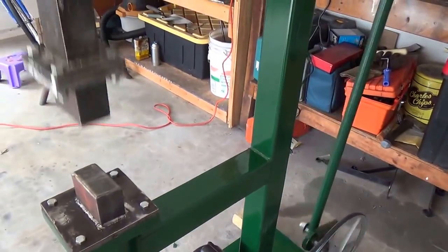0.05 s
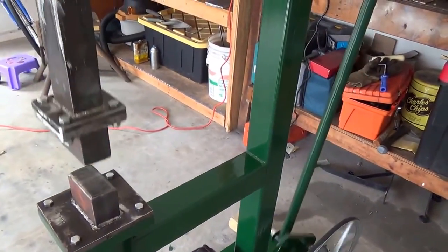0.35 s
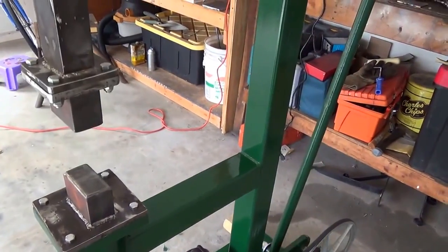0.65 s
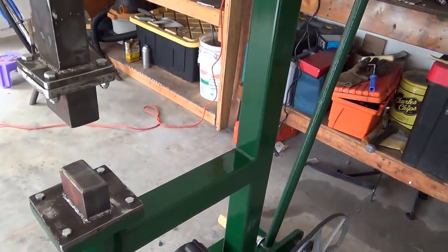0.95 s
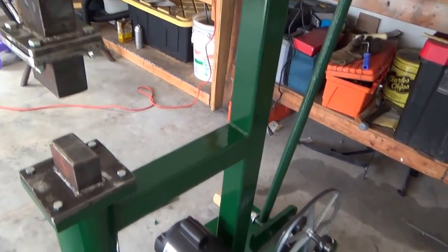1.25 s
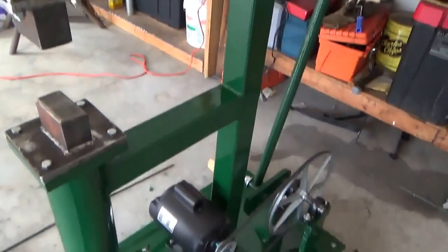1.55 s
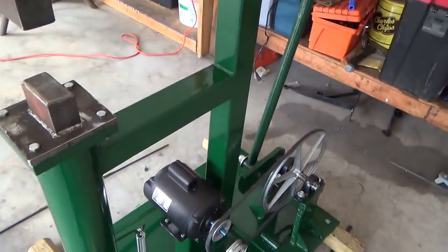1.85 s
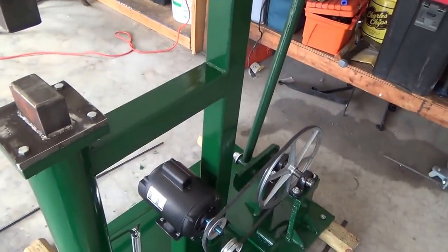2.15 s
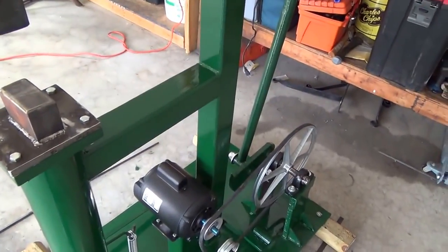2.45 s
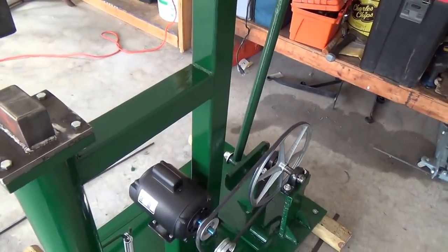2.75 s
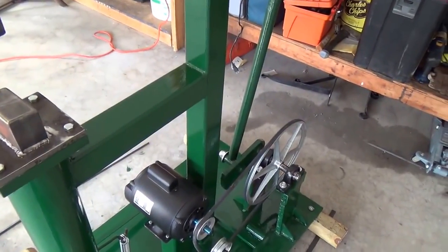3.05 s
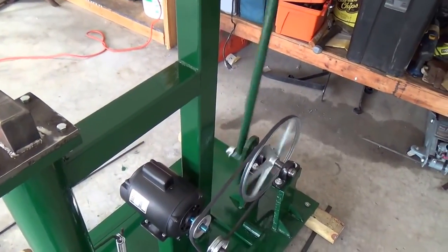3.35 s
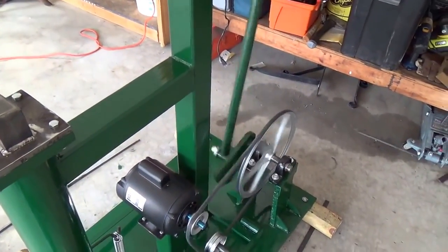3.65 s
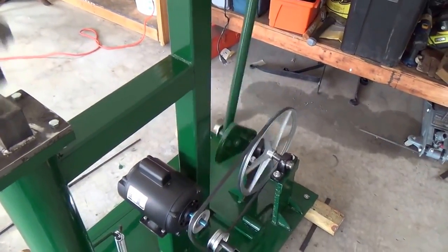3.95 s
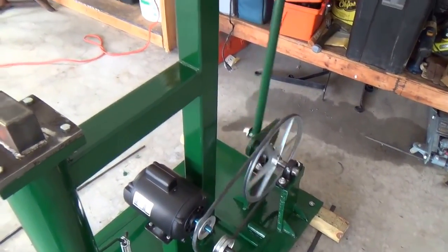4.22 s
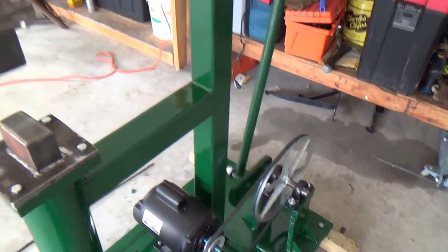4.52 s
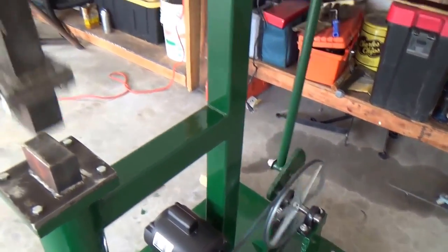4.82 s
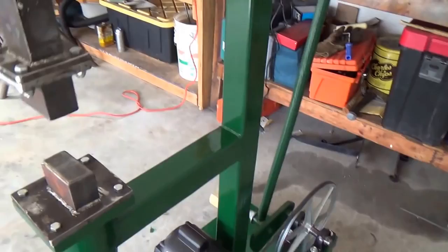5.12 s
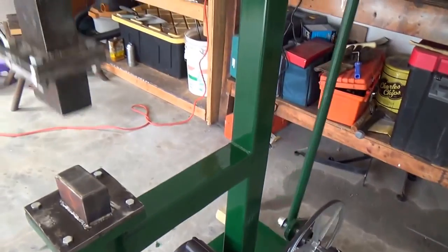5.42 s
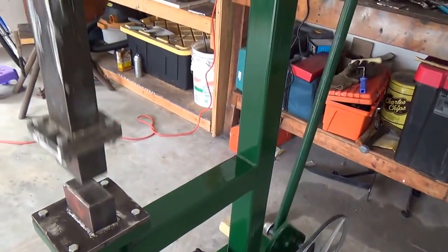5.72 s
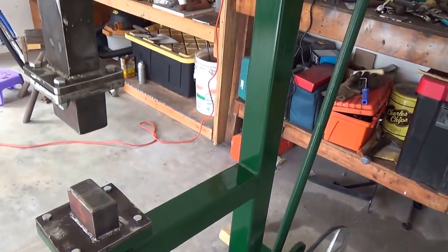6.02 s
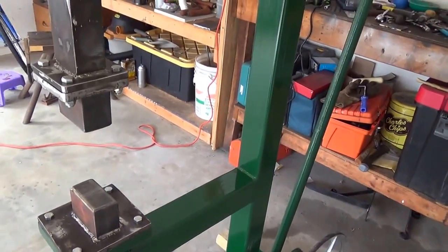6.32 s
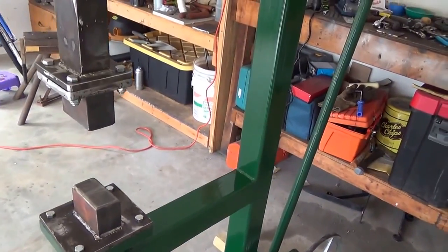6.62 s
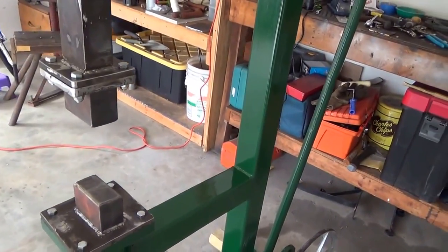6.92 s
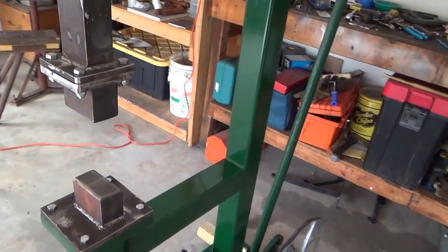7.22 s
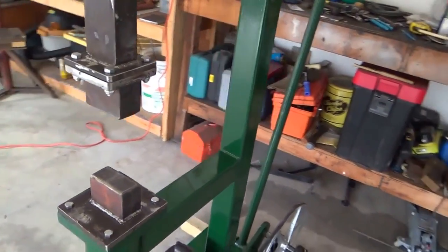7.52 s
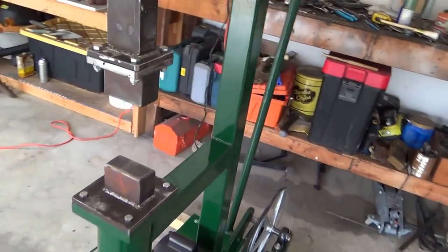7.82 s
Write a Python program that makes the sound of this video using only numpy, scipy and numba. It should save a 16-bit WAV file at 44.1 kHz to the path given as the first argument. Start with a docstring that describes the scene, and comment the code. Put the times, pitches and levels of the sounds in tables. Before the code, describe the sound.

A motor-driven power hammer is heard close up in a garage. Light linkage clanks lead into one loud steel-on-steel bang at about 0.3 seconds, which rings briefly and leaves a few clinks. An electric motor then hums with a soft fan hiss, growing gradually louder from about 1.5 seconds and peaking between 3.4 and 4.4. The linkage starts clanking at 3.4 seconds, and five heavy blows land at about 3.6, 4.0, 4.4, 5.0 and 5.7 seconds, spaced ever wider. The first carries a very brief high squeal, and the early ones have low thumps beneath them. Each blow is a hard, dense bang with ringing steel and short room echo, and loose parts clank, clink and chatter in between. From 6 seconds the motor hums quietly, with a light knock near 6.9 seconds and a faint whirr rising until the end at about 8 seconds.

```python
"""A home-built power hammer strikes its die in a garage, each impact exciting the modes of the steel frame.
The ram rebounds and squeals in its guide; the slack linkage clanks and loose parts clink and chatter.
Underneath, an electric motor hums at multiples of the mains frequency, with rotor tones and fan noise,
and grows louder as the belt grips. A limiter flattens each blow and its reverberation into a roar."""
import sys
import numpy as np
from scipy import signal
from scipy.fft import rfft, irfft, next_fast_len
from scipy.io import wavfile
from scipy.ndimage import uniform_filter1d
from numba import njit

SR = 44100
rng = np.random.default_rng(int(sys.argv[2]) if len(sys.argv) > 2 else 0)


def waveform_to_disk(signal):
    """Save audio, clipped to [-1, 1], as 16-bit WAV at the path in sys.argv[1]."""
    frames = np.transpose(np.atleast_2d(signal))
    scaled = np.clip(frames, -1, 1) * 32767
    samples = np.round(scaled).astype(np.int16)
    wavfile.write(sys.argv[1], SR, samples)


N = 351477
TIME = np.arange(N) / SR

# impacts of the ram on the die: t/s, level/dB, brightness/dB
BLOWS = [(.284, -1.5, 0), (3.592, 6, 4.5), (3.952, 4, 7), (4.404, 1.5, 6.5), (4.957, -1, 3.5),
         (5.690, -2, 6)]
# joints of crank, rod and ram guide taking up their slack, and at 0.29 s a second contact of the die in the
# first blow: t/s, level/dB, brightness/dB
CLANKS = [(.001, -27, -14.5), (0.0603, -27, 2), (0.079, -20.5, 6), (0.114, -26, -6), (.139, -21, 8),
          (.158, -16.5, 4), (.2, -24.5, -7), (.29, -4, -2), (.433, -27, 1), (.526, -20, -4),
          (0.613, -38, 17), (3.442, -14, 10), (3.477, -13.5, 3), (3.5244, -16.5, 10), (3.546, -11, 12),
          (3.7787, -8.5, 10), (3.8535, -11.5, 5), (3.9142, -14, 3), (4.104, -20, 13), (4.23, -17, 6.5),
          (4.311, -19, 6), (4.3229, -13, -1.5), (4.359, -23, -8), (4.7638, -28, 15.5), (4.8305, -20.5, 9),
          (4.848, -21.5, 12.5), (4.88, -17.5, 0), (4.9356, -21.5, 12), (5.0755, -15, 2), (5.4526, -23, 6),
          (5.5182, -30, -4), (5.5432, -21, 9), (5.5912, -24, -2), (5.745, -5.5, 3), (5.8158, -16.5, 11),
          (5.865, -24, 11), (5.9439, -23, 14)]
# light knocks of the idling machine: t/s, level/dB, brightness/dB
KNOCKS = [(6.832, -57, -15), (6.869, -39, 0), (6.905, -46.5, 2)]
# resonances of frame and anvil: f/Hz, bandwidth/Hz, lift/dB
FRAME_RESONANCES = [(143.2, 15, 13.5), (201.5, 56, 17), (229.4, 55, 15.5), (312, 27, 10), (389.4, 20, 6),
                    (678, 88, 4.5), (782, 8.8, 8), (816, 25, 3), (903, 110, 6), (916, 110, 3),
                    (996, 64, 8.5), (1113, 120, 3.5), (1382, 30, 1), (1580, 55, 1.5), (1690, 59, 2),
                    (1650, 62, -4.5), (1872, 63, 0.5), (2110, 46, -11), (2232, 44, -0.5), (2290, 64, 9),
                    (3500, 63, 5.5), (5200, 560, 4), (7950, 600, 7.5), (10200, 300, 13.5), (11100, 300, 5)]
# width of the sound field: f/Hz, side level re mid/dB
FIELD_WIDTH = [(100, -11), (300, -9), (700, -6.5), (2500, -7.5), (5500, -7), (7500, -10.5), (9500, -14.5),
               (11500, -27), (13000, -37)]


def amp(db):
    """Amplitude ratio of a level in decibels."""
    return 10 ** (np.asarray(db) / 20)


def unit(x):
    """Normalisation to an rms of 1."""
    return x / np.sqrt(np.mean(x ** 2))


def fade(t, t60):
    """Exponential decay, 60 dB in t60 seconds."""
    return np.exp(-np.log(1000) * t / t60)


def along(points, hz):
    """Interpolation of (f/Hz, value) points on a logarithmic frequency axis."""
    f, value = np.transpose(points)
    return np.interp(np.log(hz + 1), np.log(f), value)


def add(track, s, sound):
    """Superposition of a sound on the track from time s."""
    i = max(int(s * SR), 0)
    track[i:i + len(sound)] += sound[:N - i]


def walk(rate_hz):
    """Slow random fluctuation of rms 1: random steps, smoothed twice."""
    hold = int(SR / rate_hz)
    steps = np.repeat(rng.standard_normal(N // hold + 1), hold)
    return unit(uniform_filter1d(uniform_filter1d(steps, hold), hold)[:N])


def tint(x, points):
    """Zero-phase filtering by (f/Hz, gain/dB) points."""
    size = next_fast_len(x.shape[-1])
    gain = amp(along(points, np.fft.rfftfreq(size, 1 / SR)))
    return irfft(rfft(x, size) * gain, size)[..., :x.shape[-1]]


def body(x, colour, modes=(), size=16384):
    """Minimum-phase resonator of unit energy: peaks on a broad spectrum; a lift's sign is ignored."""
    hz = np.fft.rfftfreq(size, 1 / SR)
    lift = 1 + sum((amp(abs(db)) ** 2 - 1) / (1 + (2 * (hz - f) / width) ** 2) ** 2
                   for f, width, db in modes)
    cepstrum = irfft(np.log(amp(along(colour, hz)) * np.sqrt(lift)))
    response = irfft(np.exp(rfft(2 * cepstrum[:size // 2], size)))
    return signal.fftconvolve(x, response / np.linalg.norm(response))[:N]


def strikes(events, crack_db, crack_t60, ring_t60, split_hz, rise_s, patchy_db=0):
    """Impact excitation: noise with a fast and a slow decay, tilted about split_hz by its brightness."""
    track, t = np.zeros(N), np.arange(SR // 2) / SR
    envelope = (amp(crack_db) * fade(t, crack_t60) + fade(t, ring_t60)) * (1 - np.exp(-t / rise_s))
    patch_hz = 331.5  # width of the bands that one contact favours
    for s, db, bright_db in events:
        patches = [(patch_hz * (k + 2), patchy_db * z) for k, z in enumerate(rng.standard_normal(48))]
        burst = unit(tint(rng.standard_normal(len(t)), patches)) * envelope
        low = signal.lfilter(*signal.butter(1, split_hz, fs=SR), burst)
        add(track, s, amp(db) * (amp(-bright_db / 2) * low + amp(bright_db / 2) * (burst - low)))
    return track


def rings(events, hz, t60, rise_s):
    """Free vibration of a single mode: a damped sinusoid after each event."""
    track, t = np.zeros(N), np.arange(2 * SR) / SR
    for s, db, *_ in events:
        add(track, s, amp(db) * fade(t, t60) * (1 - np.exp(-t / rise_s)) * np.sin(2 * np.pi * hz * t))
    return track


def echo(x, wet_db, build_s):
    """Diffuse reverberation at one point, each band decaying at its own rate; mid and side."""
    # reverberation time of the garage: f/Hz, T60/s
    decay_times = [(100, 0.26), (300, 0.75), (1000, 0.66), (3000, 0.57), (6000, 0.48), (12000, 0.28)]
    t, hz = np.arange(SR) / SR, np.fft.rfftfreq(SR, 1 / SR)
    centres, t60s = np.transpose(decay_times)
    noise, tail = rfft(rng.standard_normal((2, SR))), 0
    for t60, band in zip(t60s, np.eye(len(centres))):
        share = np.interp(np.log(hz + 1), np.log(centres), band)
        tail = tail + irfft(noise * share) * fade(t, t60)
    tail = tail * (1 - np.exp(-t / build_s))
    mid, side = amp(wet_db) * tail / np.linalg.norm(tail[0])
    return np.array([signal.fftconvolve(x, response)[:N] for response in (mid, tint(side, FIELD_WIDTH))])


def garage(x, wet_db, build_s, drift_hz=0.8):
    """Direct sound plus an echo that shifts as the listener drifts through standing waves; mid and side."""
    turn = 2 * np.pi * drift_hz * TIME
    mid, side = np.cos(turn) * echo(x, wet_db, build_s) + np.sin(turn) * echo(x, wet_db, build_s)
    return np.array([x + mid, side])


def whirr():
    """Narrow-band noise: a faint whirr that rises at the end."""
    # envelope of the whirr: t/s, level/dB
    swell = [(6.9, -71), (7.4, -59.5), (7.95, -56.5)]
    # its spectrum: f/Hz, level/dB
    colour = [(2200, -25), (2550, -2), (2720, 1), (2900, -8), (3300, -23)]
    return amp(np.interp(TIME, *np.transpose(swell))) * body(rng.standard_normal(N), colour)


def air_noise(hiss_level, nearness_db, rotation):
    """Turbulence of fan and belt: a low rush, and a hiss whose cowl resonances emerge near the motor."""
    # spectrum of the hiss: f/Hz, level/dB
    hiss_colour = [(1180, -40), (2000, -10.5), (2500, -11), (2750, -2.5), (3230, -9.5), (3640, -8),
                   (4320, -7), (6040, -6.5), (6810, -6.5), (9430, 1), (10100, -2), (12250, -5.5),
                   (12550, -12), (15500, -21)]
    # resonances of bearings and fan cowl: f/Hz, bandwidth/Hz, lift/dB
    cowl_modes = [(2700, 120, 9), (3610, 280, 12), (4750, 70, 12.5), (5750, 65, 14), (6180, 200, 13),
                  (7380, 300, 9.5), (7900, 130, 1), (9300, 200, 4), (9570, 170, 7), (12100, 300, 4)]
    # spectrum of the rush: f/Hz, level/dB
    rush_colour = [(25, -12), (60, -6), (130, -2.5), (300, 4.5), (620, 3), (1000, -2.5), (1270, -1.5),
                   (1500, -3.5), (2200, -7.5), (3500, -27.5), (8000, -55)]
    cowl_share = np.clip(1 + 0.031 * nearness_db, 0, 1) ** 2
    hiss_gain = amp(hiss_level + 6.5 + 0.84 * walk(rate_hz=35)) * (1 + 0.078 * rotation)
    resonant = np.sqrt(cowl_share) * body(rng.standard_normal(N), hiss_colour, cowl_modes)
    plain = np.sqrt(1 - cowl_share) * body(rng.standard_normal(N), hiss_colour)
    rush_level = -46 + 0.59 * (hiss_level + 54.5)
    rush = body(rng.standard_normal(N), rush_colour) * amp(rush_level + 1.1 * walk(rate_hz=16))
    return hiss_gain * (resonant + plain) + rush


def tone(hz, waver_db=3.5, drift_rad=1.0):
    """Random amplitude and phase modulation of a sinusoid: a motor tone wavering with the load."""
    gain = np.sqrt(2) * amp(waver_db * walk(rate_hz=12))
    return gain * np.sin(2 * np.pi * hz * TIME + drift_rad * walk(rate_hz=5.3))


def magnetic_hum(hum_level, rotation, mains_hz=60, waver_db=1.03):
    """Magnetic forces sound even harmonics of the mains; the fourth throbs once a turn of the rotor."""
    throb = 1 + 0.2 * amp(4.9 * walk(rate_hz=7.1)) * rotation
    fourth = amp(hum_level) * throb * tone(4 * mains_hz, waver_db, drift_rad=0.08)
    sixth_level = -45.5 - 0.89 * (hum_level + 40)  # recedes as the hum grows
    sixth = amp(sixth_level) * tone(6 * mains_hz, waver_db, drift_rad=0.08)
    second = amp(hum_level - 23.5) * tone(2 * mains_hz, waver_db, drift_rad=0.11)
    return second + fourth + sixth


def motor(rotor_hz=28.87, tonal_gain_db=2):
    """Rotating-machine noise: a line spectrum over broadband air noise; mid and side."""
    # swell as the listener nears and the belt grips: t/s, hum/dB, hiss/dB, left minus right/dB
    course = [(.9, -39, -59.5, 0.5), (1.4, -38, -58.5, 1), (2.35, -32.5, -53.5, -1),
              (3.1, -29.5, -51, -1.3), (3.42, -26.5, -46, -2), (4.35, -26.5, -45, -4),
              (4.6, -34, -57.5, -2), (6.35, -40, -61, 1), (7.95, -39.5, -58.5, 0.7)]
    # tones of rotor and belt: f/Hz, relative level/dB
    rotor_tones = [(88, -47), (144, -29), (234, -15), (246, -41), (269, -13), (333, -23.5), (383, -19),
                   (388, -14.5), (479, -22.5), (538, -39.5), (630, -33), (694, -36), (721, -37), (840, -29),
                   (1023, -24), (1141, -29), (1222, -33), (1319, -28.5)]
    # tones of the idling drive, filling the room evenly: f/Hz, level/dB
    idle_tones = [(86, -68.5), (328, -58.5), (441, -62), (544, -63.5), (694, -63)]
    times, *columns = np.transpose(course)
    hum_level, hiss_level, pan_db = (np.interp(TIME, times, column) for column in columns)
    nearness_db = hum_level + 24
    rotation = np.sin(2 * np.pi * rotor_hz * TIME)
    hum = magnetic_hum(hum_level, rotation)
    rotor_level = hum_level + 0.34 * nearness_db  # grows faster than the hum
    rotor = amp(rotor_level) * sum(amp(db) * tone(hz) for hz, db in rotor_tones)
    idle = sum(amp(db) * tone(hz) for hz, db in idle_tones)
    air_mid, air_side = (air_noise(hiss_level, nearness_db, rotation) for _ in range(2))
    mid = amp(tonal_gain_db) * (hum + rotor) + idle + air_mid
    side = tint(air_side, FIELD_WIDTH) + mid * (1 - amp(pan_db)) / (1 + amp(pan_db))
    return np.array([mid, side])


def idle_knocks():
    """Light impacts excite a few resonances while the machine idles."""
    # spectrum of a knock: f/Hz, level/dB
    colour = [(100, -25), (600, -4), (1300, -2), (2100, -2), (3000, -5), (4200, -9), (7000, -27),
              (14000, -34)]
    # its resonances: f/Hz, bandwidth/Hz, lift/dB
    modes = [(2050, 150, 8), (2400, 40, 9), (2880, 140, 0)]
    contacts = strikes(KNOCKS, crack_db=9, crack_t60=0.042, ring_t60=0.15, split_hz=2400, rise_s=0.0019)
    return body(contacts, colour, modes)


def knock_ping():
    """Quickly damped modes give each idle knock a bright onset."""
    # modes of the onset: f/Hz, level re knock/dB
    modes = [(2837, 8), (2950, -7.5), (3090, 1)]
    return sum(amp(db) * rings(KNOCKS, hz, t60=0.095, rise_s=0.001) for hz, db in modes)


def bolt_chatter(shake, ticks_per_s=40, scatter_db=3.5, t60=0.016, gain_db=-6):
    """Forced rattling: loose bolts tick at random, in proportion to the rms of the shaking."""
    # spectrum of the ticks: f/Hz, level/dB
    colour = [(1000, -33), (3000, -2), (5200, 1.5), (8300, 0), (11000, -4.5), (13000, -20), (15500, -50)]
    power = signal.lfilter(*signal.butter(1, 22, fs=SR), shake ** 2)
    ticks = (rng.random(N) < ticks_per_s / SR) * amp(scatter_db * rng.standard_normal(N))
    envelope = signal.lfilter([1], [1, -fade(1 / SR, t60)], ticks)
    return amp(gain_db) * body(np.sqrt(np.abs(power)) * envelope * rng.standard_normal(N), colour)


def clinks(spread=0.17, t60=0.03, rise_s=0.00059, count=9):
    """Free vibration of small steel parts: clusters of close, high modes that die quickly."""
    # contacts of loose washers and pins: t/s, level/dB, centre f/Hz
    contacts = [(.0338, -35.5, 7200), (.062, -22, 7800), (.079, -24, 8100), (.1116, -18, 5000),
                (0.137, -20, 5230), (0.1568, -17, 8600), (.293, 7, 9100), (.4319, -10.5, 5220),
                (0.451, -12.5, 9660), (0.526, -14.5, 4130), (.527, -19, 7950), (.613, -30, 9150),
                (3.732, -9, 9300), (3.8535, -4.5, 9800), (3.9137, -10, 5440), (3.964, 7, 8500),
                (4.1037, -7.5, 9440), (4.2144, -14, 8500), (4.4859, -9, 3440), (4.5412, -4, 5220),
                (4.6131, -16, 3480), (4.614, -23, 9300), (4.761, -29, 8450), (4.852, -9, 8280),
                (4.8993, -21, 3140), (4.936, -14, 3660), (5.1084, -15, 5170), (5.1274, -15, 5260),
                (5.182, -29, 8400), (5.445, -25, 3350), (5.4527, -18, 8270), (5.519, -15, 3050),
                (5.52, -21, 5600), (5.526, -23, 3900), (5.533, -19, 2460), (5.5437, -15, 8500),
                (5.5914, -28, 3100), (5.594, -22, 8570), (5.742, -6, 8840), (5.9254, -16, 7800)]
    track, t = np.zeros(N), np.arange(SR // 4) / SR
    for s, db, centre_hz in contacts:
        offsets = np.linspace(-1, 1, count) + rng.uniform(-0.6, 1, count) / count
        hz = centre_hz * (1 + spread * offsets)
        weights = rng.uniform(0.12, 1, count) * np.hanning(count + 2)[1:-1]
        modes = np.sin(2 * np.pi * (hz[:, None] * t + rng.random((count, 1))))
        ring = weights @ modes / np.linalg.norm(weights)
        add(track, s, amp(db) * ring * fade(t, t60) * (1 - np.exp(-t / rise_s)))
    return track


def pivot_pin():
    """Close, randomly modulated modes beat: a pin sings thinly as the linkage swings over."""
    # excitations of the pin: t/s, level/dB
    pings = [(.167, -26), (.53, -42), (3.868, -18), (4.33, -38), (4.875, -41), (5.16, -39), (5.72, -21),
             (5.81, -36)]
    # its modes: f/Hz, relative level/dB
    modes = [(13540, -6), (13660, -11), (13800, -6), (14150, -19)]
    return sum(amp(db) * rings(pings, hz, t60=0.21, rise_s=0.003) * walk(rate_hz=140) for hz, db in modes)


def connecting_rod(gain_db=-14.5):
    """Modal ringing of the rod after each clank, with new random phases every time."""
    # modes of the rod: f/Hz, relative level/dB, T60/s
    rod_modes = [(2680, -19.5, 0.15), (2870, -6, 0.2), (3450, -27, 0.14), (4920, -25.5, 0.34),
                 (5460, -16, 0.4), (6240, -29, 0.23), (8050, -17, 0.15), (8600, -30, 0.12),
                 (9500, -60, 0.16), (9900, -33, 0.24), (10500, -41, 0.28)]
    track, t = np.zeros(N), np.arange(SR // 2) / SR
    modes = np.array([amp(db) * fade(t, t60) * np.exp(2j * np.pi * hz * t) for hz, db, t60 in rod_modes])
    for s, db, bright_db in CLANKS:
        phasors = np.exp(2j * np.pi * rng.random(len(modes)))
        add(track, s, amp(gain_db + db + bright_db / 2) * (phasors @ modes).imag)
    return track


def rebounds(gap_s=0.045, drop_db=11.5, fall_db_per_s=82.5, bright_db=10.5):
    """Inelastic, uneven bounces of the ram after each blow, as rows of t/s, level/dB, brightness/dB."""
    events = []
    for s, blow_db, _ in BLOWS:
        for k in range(1, 5):
            jitter_s, scatter_db = rng.normal(0, [0.007, 5])
            delay = k * gap_s + jitter_s
            events.append((s + delay, blow_db - drop_db - fall_db_per_s * delay + scatter_db, bright_db))
    return events


def linkage_clanks():
    """Backlash: joints closing their slack, and the bouncing ram, excite the linkage's resonances."""
    # spectrum of a clank: f/Hz, level/dB
    colour = [(30, -34), (100, -0.5), (200, 8), (500, 10), (1500, 6), (3000, 4), (5500, 0), (8500, -4.5),
              (11000, -6.5), (12500, -14.5), (15500, -48)]
    # resonances of the linkage: f/Hz, bandwidth/Hz, lift/dB
    modes = [(239.4, 33, 8.5), (415, 96, 2), (674, 75, 5), (990, 88, 2), (1059, 46, 4.5), (3090, 120, -1.5),
             (3550, 140, 0), (5360, 770, 2), (7700, 230, 3), (8370, 240, 6), (10900, 440, 3.5)]
    contacts = strikes(CLANKS + rebounds(), crack_db=5.5, crack_t60=0.019, ring_t60=0.12,
                       split_hz=2430, rise_s=0.0017, patchy_db=2)
    return body(contacts, colour, modes)


def guide_squeal(fundamental_hz=2010, waver=0.0054):
    """Stick-slip friction of the lifting ram in its guide gives high harmonics of unsteady pitch."""
    # squeals: t/s, duration/s, level/dB
    squeals = [(3.6, 0.027, -1), (3.634, .03, -8), (3.668, .025, -16)]
    # their overtones: harmonic number, relative level/dB
    harmonics = [(4, 1), (5, 0), (6, -9)]
    swell = np.zeros(N)
    for s, length, db in squeals:
        add(swell, s, amp(db) * np.hanning(int(length * SR)))
    phase = 2 * np.pi * np.cumsum(fundamental_hz * (1 + waver * walk(rate_hz=270))) / SR
    return swell * sum(amp(db) * np.sin(k * phase) for k, db in harmonics)


def base_thumps():
    """Soft impacts give low frequencies: the base rocks on its timber feet in the hardest strokes."""
    # landings of the base: t/s, level/dB, brightness/dB
    thumps = [(3.55, -25, -6), (3.87, -16, -9), (3.96, -2, -12), (4.31, -17, -1), (4.41, -13, -6)]
    # spectrum of a thump: f/Hz, level/dB
    colour = [(25, -25), (50, -17), (75, -2), (105, -10), (150, 4), (220, 5), (400, -36), (1000, -77)]
    contacts = strikes(thumps, crack_db=0, crack_t60=0.022, ring_t60=0.11, split_hz=560, rise_s=0.0054)
    return body(contacts, colour)


def frame_ring(scatter_db=4.5, side_db=-12):
    """Lightly damped modes of the frame ring on, weighted anew by each blow; mid and side."""
    # long modes of the steel frame: f/Hz, level re blow/dB, T60/s
    long_modes = [(618.6, -40, 5.3), (683, -26, 0.82), (883, -22, 0.85), (1020, -21, 0.52),
                  (1105, -24, 0.59), (1336, -26, .85), (1515, -27, 0.89), (1643, -29.5, 1.12),
                  (1820, -40, .6), (1878, -31, 0.65), (2196, -31, 0.89), (2230, -31, 0.92)]
    mid, side, t = np.zeros(N), np.zeros(N), np.arange(2 * SR) / SR
    modes = np.array([amp(db) * fade(t, t60) * np.exp(2j * np.pi * hz * t) for hz, db, t60 in long_modes])
    for s, db, _ in BLOWS:
        weights = amp(db + scatter_db * rng.standard_normal(len(modes)))
        phasors = np.exp(2j * np.pi * rng.random(len(modes)))
        add(mid, s, (weights @ modes).imag)
        add(side, s, amp(side_db) * (weights * phasors @ modes).imag)
    return np.array([mid, side])


def die_crack(gain_db=4):
    """Contact damping stops the dies' modes almost at once: the hard front of each blow."""
    # modes of the dies: f/Hz, relative level/dB, T60/s
    modes = [(942, 3.5, 0.028), (1260, -20, 0.026), (1520, -12.5, 0.041), (1687, 7, 0.032),
             (2040, 6.5, 0.022)]
    return amp(gain_db) * sum(amp(db) * rings(BLOWS, hz, t60, rise_s=0.0023) for hz, db, t60 in modes)


def die_slam(smack_db=3, thud_db=-21):
    """Direct sound of the impact: die smacks on die and the frame's four lowest resonances thud."""
    # spectrum of the smack: f/Hz, level/dB
    colour = [(40, -32), (110, -9.5), (200, 5), (500, -10.5), (850, 5.5), (1250, -5.5), (1750, -5),
              (2600, -17), (6000, -13), (11000, -17), (15500, -74)]
    contacts = strikes(BLOWS, crack_db=-15, crack_t60=0.017, ring_t60=0.23, split_hz=2200, rise_s=0.0021)
    thud = sum(amp(db) * rings(BLOWS, hz, t60=0.4, rise_s=0.023) for hz, _, db in FRAME_RESONANCES[:4])
    return amp(smack_db) * body(contacts, colour) + amp(thud_db) * thud


def ram_blows():
    """Impact of the ram on the die: a broadband force drives the resonances of frame and anvil."""
    # spectrum of a blow: f/Hz, level/dB
    colour = [(30, -43), (100, -23), (150, -10.5), (450, 4), (570, -5), (1000, 1.5), (1600, 1), (3000, -9),
              (5500, -15), (7000, -18.5), (11000, -20.5), (13000, -19.5), (15500, -52)]
    contacts = strikes(BLOWS, crack_db=7.5, crack_t60=0.06, ring_t60=0.2, split_hz=720, rise_s=0.0021)
    return body(contacts, colour, FRAME_RESONANCES)


def scene():
    """Superposition of the reverberant hammer, its direct sounds and the motor; left and right."""
    # lean of the bass to the right: f/Hz, share of mid added to side/dB
    bass_lean = [(80, -14.5), (300, -21.5), (700, -18), (2000, -37), (8000, -50)]
    hammer = ram_blows() + linkage_clanks() + idle_knocks() + base_thumps()
    hammer += pivot_pin() + connecting_rod()
    mid, side = garage(hammer, wet_db=0, build_s=0.0024) + garage(clinks(), wet_db=-4, build_s=0.0037)
    mid = mid + bolt_chatter(shake=mid)
    mid = mid + die_crack() + die_slam() + knock_ping() + guide_squeal() + whirr()
    mid, side = np.array([mid, side]) + frame_ring() + motor()
    side = side + tint(mid, bass_lean)
    return np.array([mid - side, mid + side])


@njit
def follow(level, release):
    """Peak detection: instant rise, exponential fall."""
    out, held = np.empty(len(level)), 0.
    for i in range(len(level)):
        held = max(level[i], held * release)
        out[i] = held
    return out


def limiter(x, threshold_db, ratio, release_s, attack_s):
    """Dynamic compression: the gain lags a jump in power, so the front of a blow gets through."""
    keep = np.exp(-1 / (attack_s * SR))
    power = signal.lfilter([1 - keep], [1, -keep], np.mean(x ** 2, axis=0))
    held = follow(np.sqrt(power), np.exp(-1 / (release_s * SR)))
    return x / np.maximum(held / amp(threshold_db), 1) ** (1 - 1 / ratio)


def record(dry):
    """Limiting flattens the blows, saturation rounds the peaks, filters cut the deep bass and the top."""
    full_scale, low_cut_hz, top_hz = amp(0.5), 39, 15700
    limited = limiter(dry, threshold_db=-13.5, ratio=14, release_s=0.014, attack_s=0.00044)
    rounded = full_scale * np.tanh(limited / full_scale)
    thinned = signal.sosfilt(signal.butter(2, low_cut_hz, "high", fs=SR, output="sos"), rounded)
    return signal.sosfilt(signal.ellip(8, .2, 70, top_hz, fs=SR, output="sos"), thinned)


dry = scene()
out = record(dry)
waveform_to_disk(out)
```